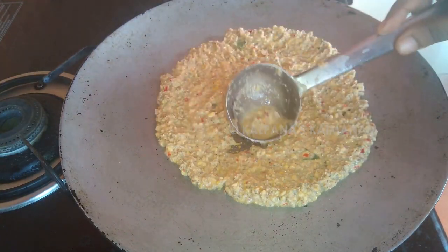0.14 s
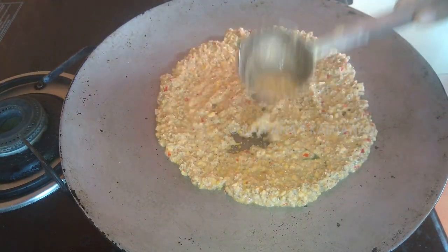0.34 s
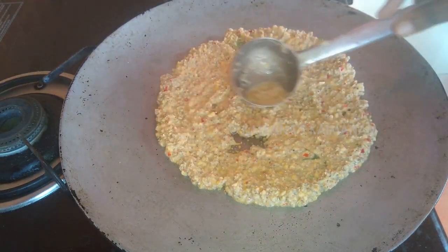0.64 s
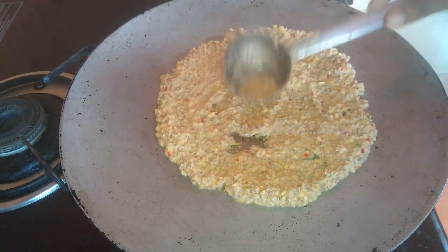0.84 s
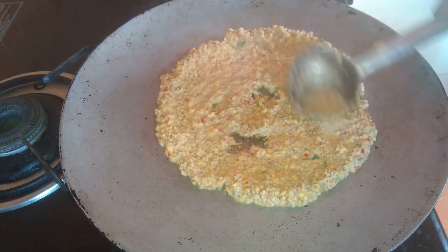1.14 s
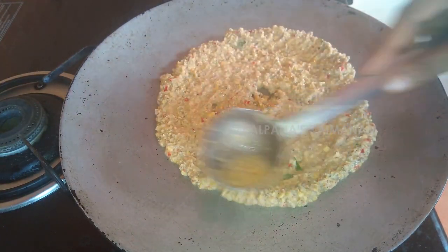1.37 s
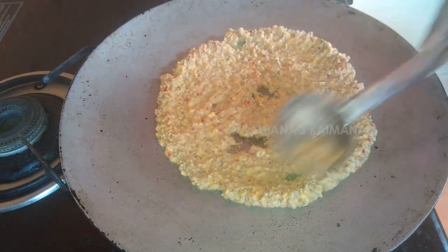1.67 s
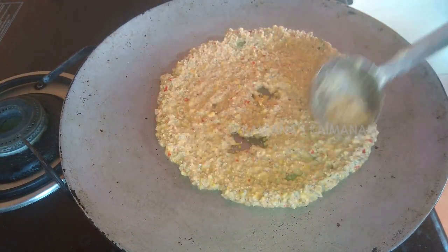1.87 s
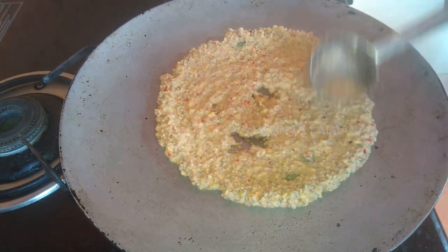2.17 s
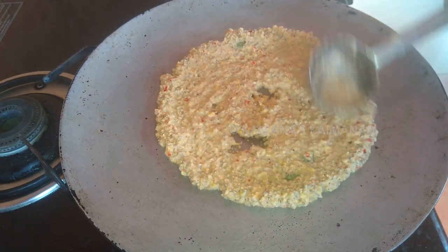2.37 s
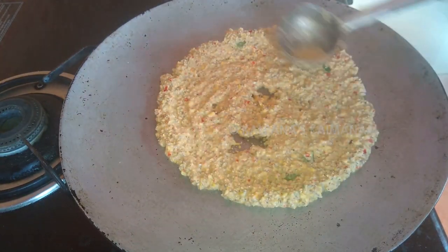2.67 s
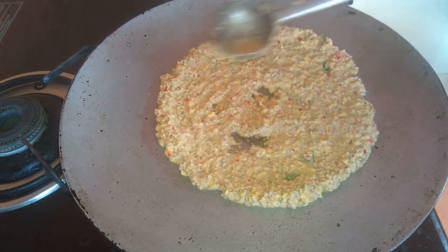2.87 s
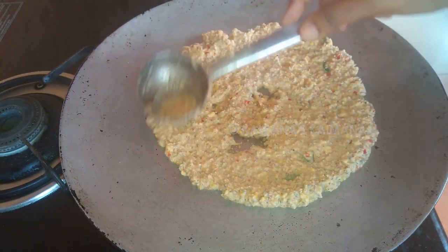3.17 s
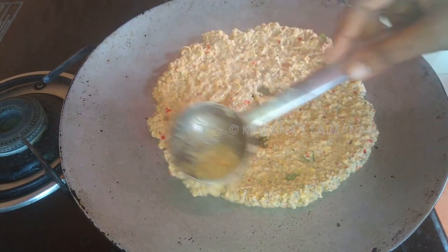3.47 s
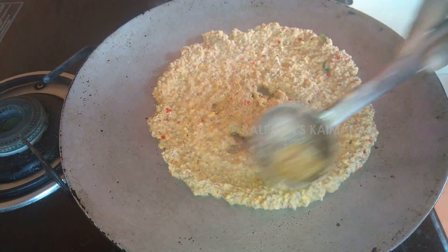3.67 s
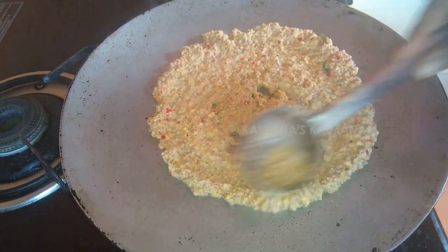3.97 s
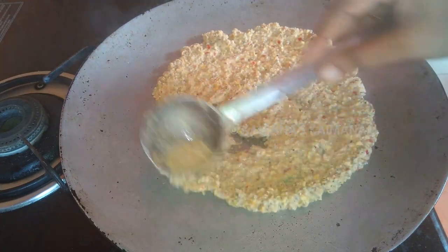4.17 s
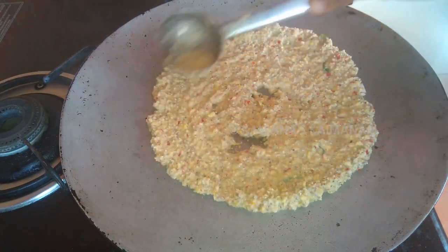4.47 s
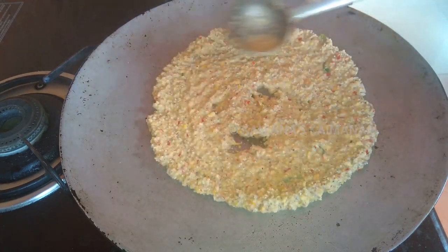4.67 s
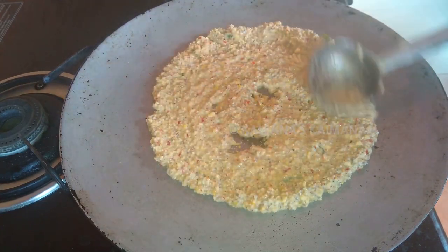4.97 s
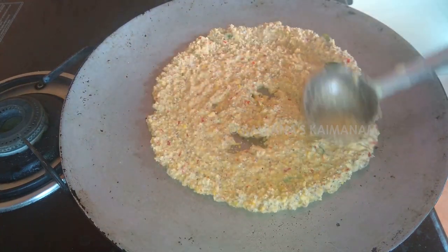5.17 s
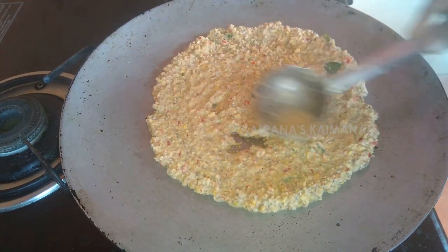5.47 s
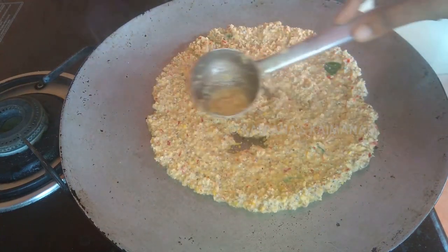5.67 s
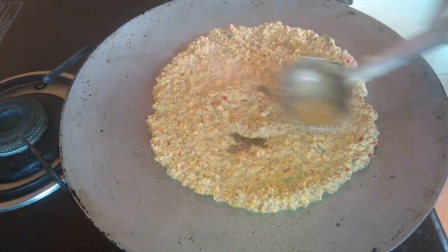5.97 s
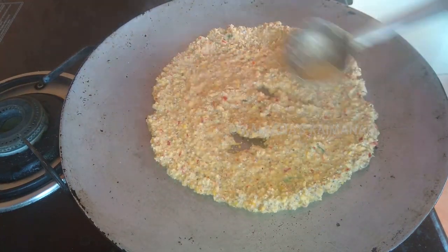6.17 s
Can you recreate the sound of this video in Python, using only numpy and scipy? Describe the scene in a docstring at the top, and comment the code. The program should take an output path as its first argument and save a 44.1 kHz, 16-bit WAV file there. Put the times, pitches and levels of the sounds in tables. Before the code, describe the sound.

Wet batter sizzles loudly on a hot iron griddle, a bright crackling hiss with sharp spits as a ladle smears it in soft squelchy strokes.

```python
"""Kitchen, at a hot iron griddle, microphone close: batter sizzles while a steel ladle spreads it in circles.
Steam bubbles burst by the thousand as random clicks ringing briefly, over a hiss of filtered noise; both
flare when the ladle pushes wet batter onto hot metal. The ladle smears as grainy noise and drops spit as
bright single clicks. The iron answers in dull noise, over a wavering drone and rumble of the gas flame
and steady kitchen air. Hard walls add a short tail to the sizzle."""
import sys
import numpy as np
from scipy import signal
from scipy.fft import rfft, irfft
from scipy.io import wavfile

SR = 44100
rng = np.random.default_rng(int(sys.argv[2]) if len(sys.argv) > 2 else 0)


def transcribe(signal):
    """Save signal, clipped to [-1, 1], as a 16-bit WAV file at the path in sys.argv[1]."""
    frames = np.atleast_2d(signal).T
    limited = np.clip(frames, -1, 1)
    pcm = np.round(limited * 32767).astype(np.int16)
    wavfile.write(sys.argv[1], SR, pcm)


N = 279594
TIME = np.arange(N) / SR  # s
HZ = np.fft.rfftfreq(N, 1 / SR)

# How hard the batter boils; it calms, then builds on reaching fresh iron: [t/s, relative level/dB]
BOIL_CURVE = [(0, -19.5), (.3, -20.5), (.6, -22.5), (1.0, -24.5), (1.2, -25.5), (1.45, -28), (1.72, -27),
              (1.95, -24.5), (2.3, -24), (2.75, -23), (3.1, -19), (3.5, -20), (4.1, -18.5), (4.55, -19.5),
              (5.15, -18), (5.6, -21), (5.9, -22.5), (6.34, -24)]
# Pushes of the ladle onto hot metal: [start t/s, length t/s, sizzle flare/dB, squelch rise before shares/dB]
LADLE_PUSHES = [(0.214, 0.048, 2, 4), (0.27, 0.036, 1, -2), (.38, 0.066, .3, 2.5), (0.762, 0.082, 1, 5),
                (0.933, .06, 1.5, 1.5), (1.035, 0.04, 2.5, 7), (1.251, .045, 1.5, 2.5),
                (1.334, .055, 1.5, 4.5), (1.502, .11, 3, 3), (1.823, 0.039, 3.5, 0.7),
                (1.984, 0.047, 3, 3.5), (2.198, .06, 3.5, -2.5), (2.347, 0.056, 2, 2),
                (2.405, 0.11, 2, 0.5), (2.56, 0.14, 1.4, 1), (2.808, 0.099, 1, 1.5), (3.055, 0.24, 0.2, 3),
                (4.25, 0.029, 0, 3), (4.838, 0.043, 0, 1.5), (4.997, 0.24, -0.2, 0.5),
                (5.708, 0.044, 2.2, 4), (6.239, .05, 1, 2)]
PUSH_ATTACK_S, PUSH_RELEASE_S = .018, .03
# Drops that spit: [t/s, relative level/dB]
SPIT_DROPS = [(0.6184, -17), (0.7184, -16), (0.9423, -10.5), (1.193, -9), (1.2604, -10), (1.272, -6),
              (1.373, -8), (1.51, -5), (1.583, -9), (1.676, -13.5), (1.722, -19), (1.7542, -4),
              (1.7858, -6), (1.8694, -3), (1.9175, -10), (1.941, -4), (2.1134, -7.5), (2.167, -7.5),
              (2.4227, -2), (2.5551, -3), (2.6374, -2), (2.6722, -1), (3.3216, -8), (3.6563, -1),
              (4.2294, -2.5), (4.955, -3.5), (5.6684, -8), (6.288, -5)]
# Soft bumps of the ladle on the iron: [t/s, relative level/dB]
LADLE_BUMPS = [(.235, -53), (.27, -55), (3.86, -57.5), (4.17, -53), (4.44, -45), (4.81, -59.5),
               (4.94, -45.5), (5.36, -55.5), (5.66, -46), (5.82, -54)]
# The bowl of the ladle rubs through to the iron: [start t/s, length t/s, relative level/dB]
LADLE_RUBS = [(.62, 0.23, -58), (1.202, .6, -65.5), (2.195, 0.38, -58), (2.748, 0.63, -62),
              (4.45, 0.86, -65)]
# Swells of the low rumble and drone: [start t/s, length t/s, relative level/dB]
RUMBLE_SWELLS = [(.02, 0.16, -51), (0.414, 0.16, -50), (1.191, 0.12, -55.5), (1.55, 0.31, -53.5),
                 (2.0, .14, -57), (2.61, .14, -51), (2.959, 0.245, -53), (3.51, .1, -55),
                 (4.017, .07, -55.5), (5.0, .1, -55.5), (5.897, .1, -54)]
# A narrow drone in the rumble climbs and fades: [t/s, f/Hz, level before swells/dB]
DRONE_CURVE = [(0, 63.5, -58), (.75, 67, -58.5), (1.1, 71.1, -62.5), (2.1, 73, -63.5), (3.1, 78.05, -64.5),
               (6.34, 78, -62)]

# Spectrum of one bursting bubble: [f/Hz, relative level/dB]
BURST_SPECTRUM = [(200, -43.5), (600, -29), (1500, -24.5), (3000, -17), (5000, -13), (7000, -8),
                  (8200, -5.5), (9700, -0.5), (11000, -1.5), (13000, -9.5), (16000, -14)]
# Spectrum of the steam hiss: [f/Hz, relative level/dB]
STEAM_SPECTRUM = [(200, -32.5), (700, -26), (1500, -19.5), (3000, -12), (4300, -10), (6500, -9.5),
                  (8000, -5), (9700, 0), (11000, -3), (13000, -6.5), (16000, -10)]
# Spectrum of batter smearing under the ladle: [f/Hz, relative level/dB]
SMEAR_SPECTRUM = [(150, -33), (330, -13), (600, -11), (800, -8), (950, -3), (1200, -4), (1600, 2.5),
                  (2100, 0), (3000, -28), (6000, -36)]
# Spectrum of the rubbed iron: [f/Hz, relative level/dB]
PLATE_SPECTRUM = [(100, -20), (185, 0.5), (250, -9), (300, -5.5), (335, 5.5), (385, -8), (430, -16),
                  (480, -8), (900, -46)]
# Spectrum of the bumped iron: [f/Hz, relative level/dB]
BUMP_SPECTRUM = [(60, -16), (170, -4), (330, 4), (600, 4), (1000, -15), (2500, -36)]
# Spectrum of the flame's rumble: [f/Hz, relative level/dB]
FLAME_SPECTRUM = [(15, -30), (32, -18), (50, -5.5), (72, -9), (103, 2), (135, -8), (250, -17.5), (600, -53)]
# Spectrum of the kitchen air: [f/Hz, relative level/dB]
AIR_SPECTRUM = [(20, -24), (70, -29), (120, -5.5), (195, -0.5), (250, -15), (430, -9), (800, -14.5),
                (2000, -46), (8000, -48)]

# Likeness of the two channels, limited to -1..1 in use: [f/Hz, correlation]
CHANNEL_LIKENESS = [(60, .985), (130, 1.1), (290, 0.6), (620, 0.54), (950, 0.7), (1400, 0.25), (2100, 0.22),
                    (3100, -0.14), (4400, -0.13), (6300, 0), (7400, 0.2)]
# Balance of the two channels: [f/Hz, left minus right/dB]
CHANNEL_BALANCE = [(100, 0), (200, 1), (380, -3), (700, 2), (1150, -0.5), (1550, -3), (2400, -2),
                   (4200, -3), (6000, -1), (7700, -1), (9000, 0), (10200, -5.5), (12200, -6.5),
                   (15500, -2.5)]
# Moments when the treble spreads wide: [start t/s, length t/s]
WIDE_MOMENTS = [(.115, .1), (.585, .065), (.69, .065), (1.115, .165), (1.43, .11), (1.84, .065),
                (2.16, .065), (2.715, .065), (3.82, .07), (4.42, .08), (4.705, .065), (5.215, .065),
                (5.725, .07)]
# Where the boil is liveliest: [t/s, left minus right about the middle/dB]
BOIL_LEAN = [(0, 0.1), (1.3, .2), (2.2, -1), (2.7, -1.5), (3.2, 0.2), (3.7, 0.8), (4.3, -0.2), (6.3, -0.4)]
BAND_LIMIT_HZ = 15800


def burst(pitch=1, size=512):
    """One bursting bubble: a sharp, minimum-phase start and a few dying cycles."""
    level_db = read(BURST_SPECTRUM, abs(np.fft.fftfreq(size, 1 / SR)) / pitch)
    log_gain = np.log(gain_of(level_db))
    # the Hilbert transform of the log gain supplies the minimum phase
    tick = np.fft.ifft(np.exp(np.conj(signal.hilbert(log_gain)))).real
    return tick / abs(tick).max()


def bubbles(boil_db, per_s=2200, size_db=3.0, largest_db=13.0, crowding=.5,
            pitch_range=0.093, level_db=-3.0, count=5):
    """Bubbles of several pitches burst at random; a harder boil makes them more frequent and louder."""
    busy = gain_of(boil_db - boil_db.max()) ** (2 * crowding)
    chance = per_s * busy / (SR * count)  # per sample, for each pitch
    crackle = np.zeros((2, N))
    for pitch in 1 + pitch_range * np.linspace(-1, 1, count):
        raw_db = size_db * rng.exponential(1, (2, N))
        sizes = gain_of(largest_db * np.tanh(raw_db / largest_db))
        signs = rng.choice([-1, 1], (2, N))
        clicks = sizes * signs * (rng.random((2, N)) < chance)
        crackle += signal.oaconvolve(clicks, burst(pitch)[None])[:, :N]
    steady = evened(crackle / np.sqrt(busy))  # crowding alone no longer changes the level
    return gain_of(boil_db + level_db) * steady


def steam(boil_db, escape_db, fizz_db=-2.0, vapour_db=-4.0, puff_db=1.26, puff_hz=25):
    """A smooth hiss: countless tiny bubbles on top follow the boil, vapour escapes in small puffs below."""
    whole = hiss(STEAM_SPECTRUM)
    fizz = treble(whole, order=10)
    vapour = whole - fizz
    vapour_gain = gain_of(escape_db + vapour_db + puff_db * flutter(puff_hz))
    fizz_gain = gain_of(boil_db + fizz_db + puff_db * flutter(puff_hz))
    return fizz * fizz_gain + vapour * vapour_gain


def pushes():
    """Each push makes the sizzle flare and the batter squelch: two curves in dB."""
    flare_db, squelch_db = np.zeros((2, N))
    for start, length, flare, squelch in LADLE_PUSHES:
        press = gesture(start, length, PUSH_ATTACK_S, PUSH_RELEASE_S)
        flare_db += flare * press
        squelch_db += squelch * press
    return flare_db, squelch_db


def ladle(drag_db, level_db=-26.0, grain_db=3.5, grain_hz=150):
    """Wet batter squelches unevenly under the bowl of the ladle: noise with a fast random grain."""
    grain = evened(gain_of(grain_db * flutter(grain_hz)))
    return hiss(SMEAR_SPECTRUM) * grain * gain_of(drag_db + level_db)


def spits(level_db=2.0, edge_hz=5000):
    """Single larger drops snap above the crackle as bursts, thin and bright."""
    clicks = np.zeros(N)
    for s, db in SPIT_DROPS:
        clicks[round(s * SR)] += gain_of(db + level_db)
    snaps = signal.oaconvolve(clicks, burst())[:N]
    return treble(snaps, edge_hz, order=2)


def plate(glide_db=-75, attack_s=0.087, release_s=0.17, t60=0.15, rightward_db=2):
    """The heavy iron answers the ladle's rubs and bumps dully, cushioned by the batter."""
    blows = np.zeros(N)
    for s, db in LADLE_BUMPS:
        age = np.maximum(TIME - s, 0)
        onset = 1 - np.exp(-age / 0.0015)
        blows += gain_of(db - 60 * age / t60) * onset
    rubbing = sum(gain_of(db) * gesture(start, length, attack_s, release_s)
                  for start, length, db in LADLE_RUBS)
    rubbed = noise(PLATE_SPECTRUM) * np.hypot(gain_of(glide_db), rubbing)
    bumped = noise(BUMP_SPECTRUM) * blows
    # left down and right up, each by this much
    return (rubbed + bumped) * gain_of([[-rightward_db], [rightward_db]])


def burner(flame_db=-60.0, air_db=-60, swell_drone_db=-2, swell_flame_db=-6, attack_s=0.03,
           release_s=0.046, waver_db=3.0, waver_hz=9, slip_rad=0.88):
    """The low rumble and drone of the flame swell together over the steady air of the kitchen."""
    swell = sum(gain_of(db) * gesture(start, length, attack_s, release_s)
                for start, length, db in RUMBLE_SWELLS)
    s, hz, drone_db = np.transpose(DRONE_CURVE)
    phase = 2 * np.pi * np.cumsum(np.interp(TIME, s, hz)) / SR
    phase += slip_rad * flutter(waver_hz)
    strength = np.hypot(gain_of(np.interp(TIME, s, drone_db)), swell * gain_of(swell_drone_db))
    wavering = np.sin(phase) * gain_of(waver_db * flutter(waver_hz))
    drone = evened(wavering) * strength
    rumble = noise(FLAME_SPECTRUM) * np.hypot(gain_of(flame_db), swell * gain_of(swell_flame_db))
    air = noise(AIR_SPECTRUM) * gain_of(air_db)
    return drone + rumble + air


def kitchen(x, t60=0.13, wet_db=-9, dull_hz=5000):
    """A short diffuse tail from the hard walls: decaying noise, weaker in the treble."""
    t = TIME[:SR // 2]
    tail = rng.standard_normal((2, len(t))) * gain_of(-60 * t / t60) * (t > .003)
    tail /= np.linalg.norm(tail[0])
    answer = rfft(tail, N) / np.sqrt(1 + (HZ / dull_hz) ** 2)
    return gain_of(wet_db) * irfft(rfft(x) * answer, N)


def spread(streams, centred=0.98, edge_s=.015):
    """The treble sits near the centre and now and then spreads wide; the rest varies by frequency."""
    wide = sum(np.clip(np.minimum(TIME - start, start + length - TIME) / edge_s + .5, 0, 1)
               for start, length in WIDE_MOMENTS)
    same = np.clip(centred * (1 - wide), 0, 1)
    top = treble(streams)
    return ports(streams - top) + paired(*top, same)


def ports(streams):
    """Unrelated streams become left and right at the microphone: alike in the bass, diffuse in the middle."""
    same = np.clip(read(CHANNEL_LIKENESS, HZ), -1, 1)
    return irfft(paired(*rfft(streams), same), N)


def paired(a, b, same):
    """Left is the first stream; right mixes both to the given likeness at equal power."""
    return np.array([a, same * a + np.sqrt(1 - same ** 2) * b])


def noise(tone):
    """Coloured noise as the two microphone channels hear it."""
    return ports(hiss(tone))


def hiss(tone):
    """Two unrelated streams of coloured noise."""
    white = rng.standard_normal((2, N))
    return evened(irfft(rfft(white) * gain_of(read(tone, HZ)), N))


def flutter(hz):
    """Random wavering of rms one, mostly below the given rate."""
    return evened(irfft(rfft(rng.standard_normal(N)) / (1 + (HZ / hz) ** 2), N))


def treble(x, edge_hz=7450, order=40):
    """The part of a sound above the edge; a higher order cuts more steeply."""
    return irfft(rfft(x) / (1 + (edge_hz / (HZ + 1)) ** order), N)


def gesture(start, length, attack_s, release_s):
    """Rises in a straight line, holds to its length, then dies away exponentially."""
    age = TIME - start
    return np.clip(age / attack_s, 0, 1) * np.exp(-np.clip((age - length) / release_s, 0, 20))


def follow(curve):
    """A control curve at every sample."""
    return np.interp(TIME, *np.transpose(curve))


def read(points, hz):
    """A frequency table read at the given frequencies, along a log axis."""
    f, value = np.transpose(points)
    return np.interp(np.log(hz + 1), np.log(f + 1), value)


def gain_of(db):
    """Decibels to amplitude."""
    return 10 ** (np.asarray(db) / 20)


def evened(x):
    """Scales to an rms of one."""
    return x / np.sqrt(np.mean(x ** 2) + 1e-20)


def scene(steam_per_flare=0.36, steam_per_squelch=0.78, drag_per_squelch=0.95):
    """The boil and the ladle's pushes drive the whole sizzle; the iron and the flame lie underneath."""
    boil_db = follow(BOIL_CURVE)
    flare_db, squelch_db = pushes()
    sizzle_db = boil_db + flare_db
    escape_db = boil_db + steam_per_flare * flare_db + steam_per_squelch * squelch_db
    drag_db = boil_db + drag_per_squelch * squelch_db
    sizzle = bubbles(sizzle_db) + steam(sizzle_db, escape_db) + ladle(drag_db)
    batter = spread(sizzle + kitchen(sizzle)) + spits()
    lean_db = follow(BOIL_LEAN) / 2  # half to each side
    return batter * gain_of([lean_db, -lean_db]) + plate() + burner()


def record(dry):
    """The two microphone channels colour the sound differently; peaks clip, then the band is limited."""
    lean_db = read(CHANNEL_BALANCE, HZ) / 2  # half to each side
    coloured = irfft(rfft(dry) * gain_of([lean_db, -lean_db]), N)
    heard = np.clip(coloured, -.9, .9)  # catches the loudest spits
    low_pass = signal.firwin(1023, BAND_LIMIT_HZ, window=("kaiser", 9), fs=SR)
    return signal.oaconvolve(heard, low_pass[None], "same")


dry = scene()
out = record(dry)
transcribe(out)
```